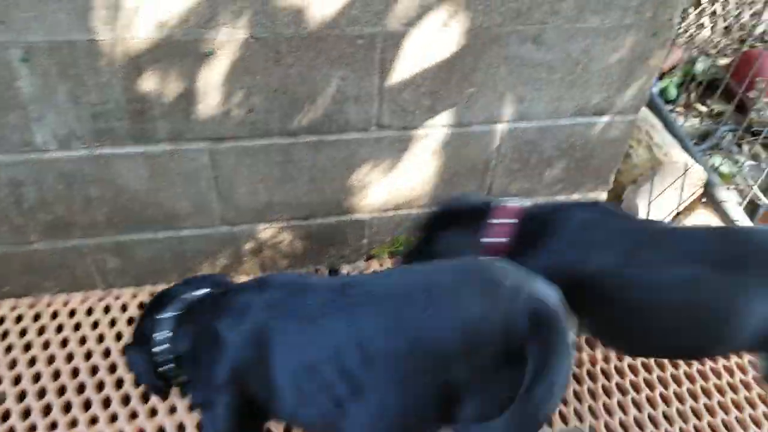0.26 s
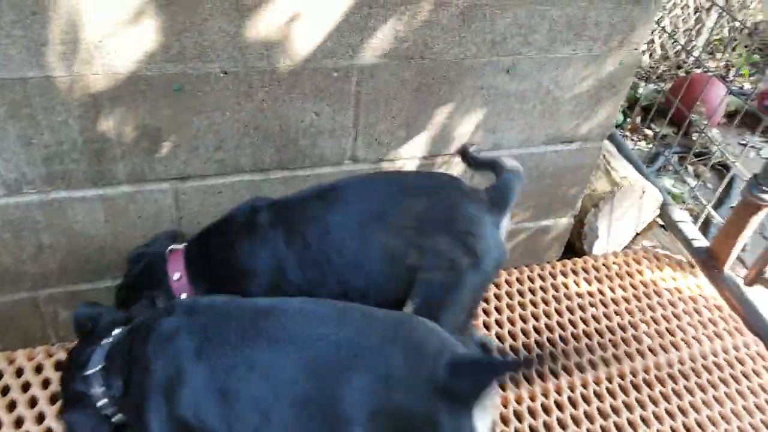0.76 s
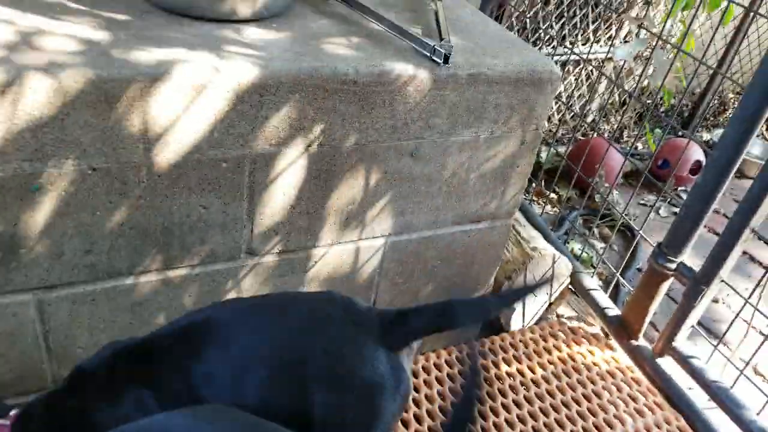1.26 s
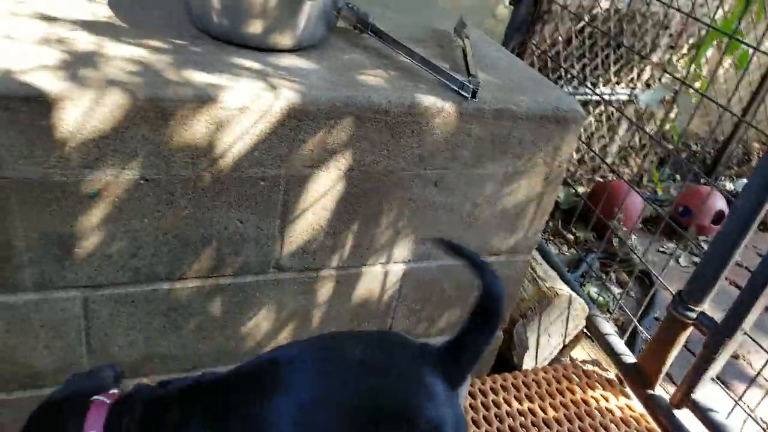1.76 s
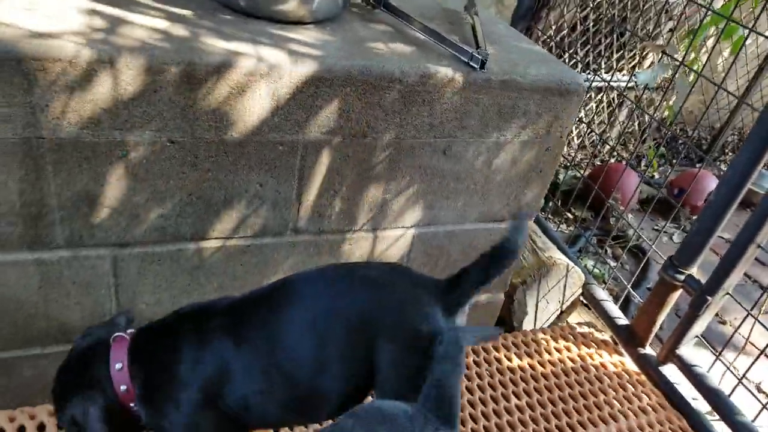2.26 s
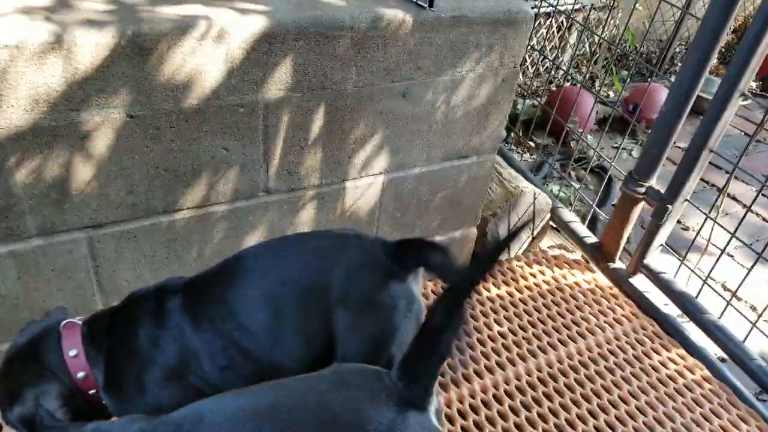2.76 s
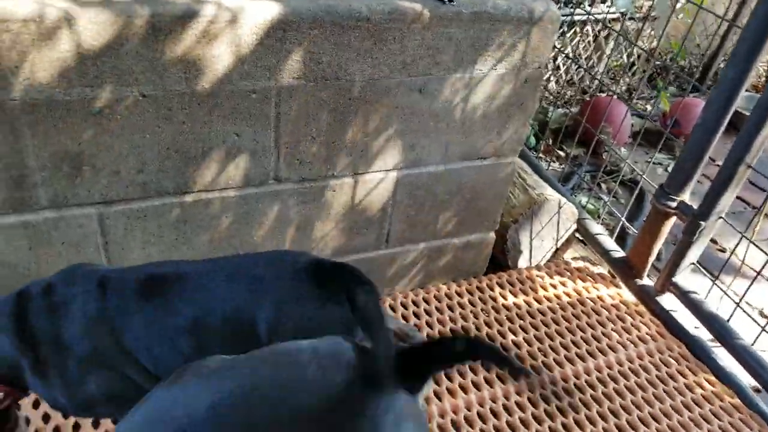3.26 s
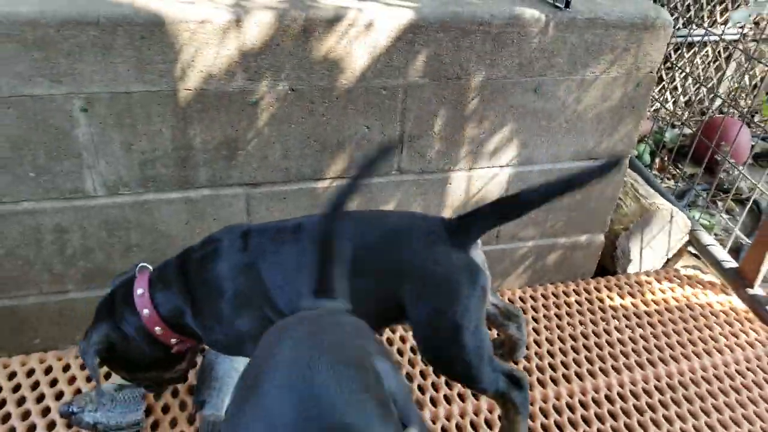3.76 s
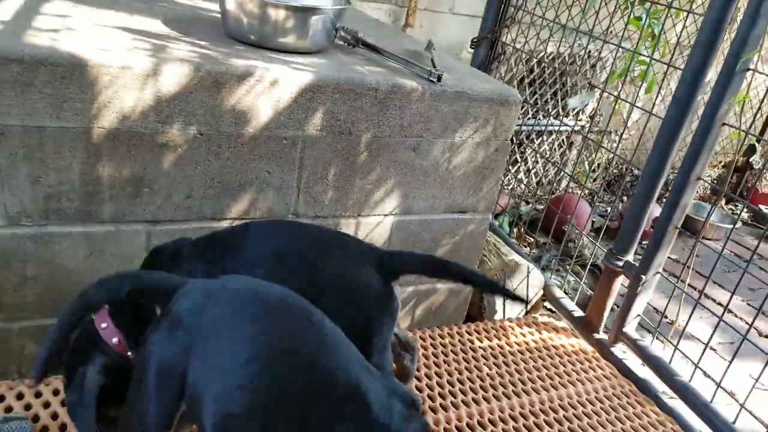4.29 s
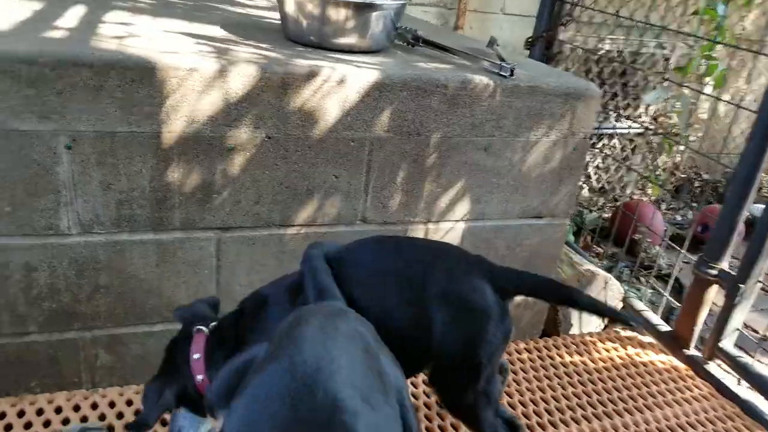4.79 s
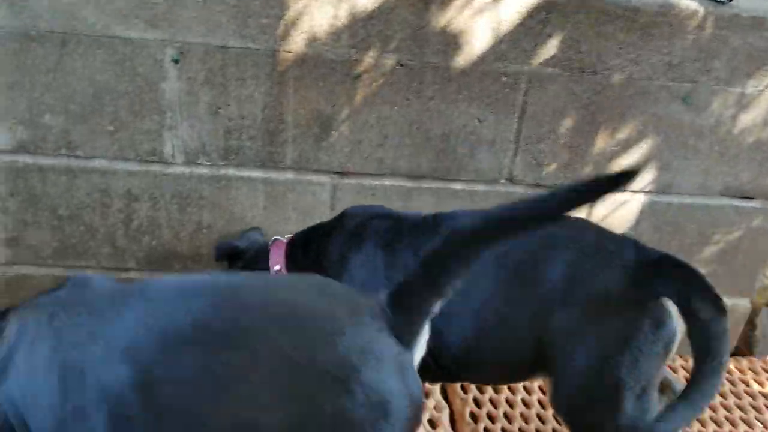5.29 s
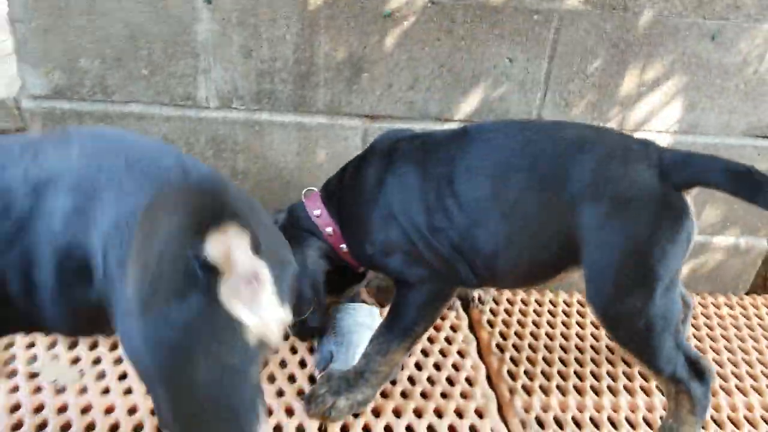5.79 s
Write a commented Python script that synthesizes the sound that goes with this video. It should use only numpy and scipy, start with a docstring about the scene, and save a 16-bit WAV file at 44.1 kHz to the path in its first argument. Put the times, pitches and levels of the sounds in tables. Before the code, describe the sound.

Shrill hinge squeal, then clattering wire mesh bangs close by; afterwards two puppies patter, scrape and tick their claws over a hard grating outdoors.

```python
"""A wire gate squeals on its hinge, a kennel gate close by in a yard, then bangs and rattles on its frame.
The squeal is jittering harmonics over grit noise; the mesh is blows and small contacts ringing panels.
Two puppies tap claws on a grating (short decaying tones and noise), a collar tag clinks (dying modes)
and paws slide (grainy noise); light wind and the far yard are shaped noise.
Heard at the two microphone ports of a hand-held camera."""
import sys
import numpy as np
from scipy import signal
from scipy.fft import rfft, irfft, next_fast_len
from scipy.io import wavfile
from scipy.ndimage import uniform_filter1d

SR = 44100
rng = np.random.default_rng(int(sys.argv[2]) if len(sys.argv) > 2 else 0)


def log_audio(samples):
    """Write samples as a 16-bit WAV file to the path given in sys.argv[1]."""
    # one column per channel
    frames = np.atleast_2d(samples).T
    # limit to full scale, then quantise
    limited = np.clip(frames, -1, 1)
    pcm = np.round(limited * 32767).astype(np.int16)
    wavfile.write(sys.argv[1], SR, pcm)


N = 266364
T = np.arange(N) / SR
HZ = np.fft.rfftfreq(next_fast_len(N + 4096), 1 / SR)


def amp(db):
    """Amplitude of a level in dB."""
    return 10 ** (np.asarray(db) / 20)


def evened(x):
    """x brought to unit rms over all its rows together."""
    return x / np.sqrt(np.mean(x ** 2) + 1e-20)


def read(points, hz):
    """Value of a frequency table at hz, interpolated along log frequency."""
    f, value = np.transpose(points)
    return np.interp(np.log(hz + 1), np.log(f + 1), value)


def columns(rows, size=N):
    """Curve columns at every sample, and a gate that fades at both ends (no fade-in for a start at zero)."""
    s, *cols = np.transpose(rows)
    t = T[:size]
    since_start = t - s[0] + (s[0] < .01)
    gate = np.clip(np.minimum(since_start, s[-1] - t) / .012, 0, 1)
    return gate, [np.interp(t, s, c) for c in cols]


def coloured(x, points):
    """Gives x the spectrum of the table by a causal minimum-phase filter of unit noise gain."""
    db = read(points, abs(np.fft.fftfreq(4096, 1 / SR)))
    log_gain = np.log(evened(amp(np.maximum(db, -90))))
    taps = np.fft.ifft(np.exp(np.conj(signal.hilbert(log_gain)))).real[:2048]
    filtered = signal.oaconvolve(np.atleast_2d(x), taps[None], axes=1)
    return filtered[:, :x.shape[-1]].reshape(x.shape)


def wander(hz, count, size=N):
    """Slow random curves of unit rms: noise low-passed at hz, drawn at a sixteenth of the sample rate."""
    b, a = signal.butter(2, hz, fs=SR / 16)
    slow = signal.lfilter(b, a, rng.standard_normal((count, size // 16 + 1)))
    smooth = uniform_filter1d(np.repeat(slow, 16, axis=1), size=16)
    return evened(smooth[:, :size])


def split(x, hz):
    """Low and high part of x."""
    low = signal.sosfilt(signal.butter(4, hz, fs=SR, output="sos"), x)
    high = signal.sosfilt(signal.butter(4, hz, "high", fs=SR, output="sos"), x)
    return low, high


def modes(table, count):
    """Dying sine modes, one per row, count samples long."""
    t = T[:count]
    return np.array([amp(db - 60 * t / t60) * np.sin(2 * np.pi * hz * t) for hz, db, t60 in table])


def strikes(times, db):
    """A train of single blows, one sample each."""
    out = np.zeros(N)
    np.add.at(out, (np.asarray(times) * SR).astype(int), amp(db))
    return out


def ports(x, lead, pan_db, echo_db, t60):
    """A source at two ports, left ahead by lead radians, plus block-wall echoes that differ at each port."""
    size, turn = 2 * len(HZ) - 2, np.exp(.5j * lead)
    gains = [turn * amp(pan_db / 2), turn.conj() * amp(-pan_db / 2)]
    direct = irfft(rfft(x, size) * gains, size)[:, :N]
    t = T[:SR // 5]
    sparse = rng.standard_normal((2, len(t))) * (rng.random((2, len(t))) < .05)
    taps = sparse * amp(-60 * t / t60) * (t > .003)
    echoes = signal.fftconvolve(direct, taps / np.linalg.norm(taps[0]), axes=1)[:, :N]
    return direct + amp(echo_db) * echoes


# Far yard spectrum. Each row: frequency in Hz, relative density in dB per Hz.
YARD_SPECTRUM = [(59, 5.5), (100, -35), (194, -2.5), (437, 0), (564, -4), (1300, -1.5), (2170, -12.5),
                 (2860, -9), (4480, -13.5), (7170, -16.5), (9470, -20.5), (15100, -17), (16500, -14)]
# Yard loudness at the camera. Each row: time in seconds, level in dB.
YARD_LEVEL = [(0.0, -41), (0.3, -45), (2.35, -46.5), (2.9, -43), (3.4, -51.5), (3.8, -52), (6.04, -51)]
# How alike the two ports hear the yard. Each row: frequency in Hz, likeness from -1 to 1 (clipped there).
YARD_LIKENESS = [(60, -0.45), (240, 1), (950, 0.41), (3770, -0.23), (15000, 0.22)]


def yard():
    """Far hum of the neighbourhood and rustle of leaves: noise in drifting time-frequency patches."""
    frames, hz = N // 256 + 5, np.fft.rfftfreq(1024, 1 / SR)
    a, b, c, d, patches = rng.standard_normal((frames, 513, 5)).T
    patches = uniform_filter1d(patches, size=14, axis=0)  # across frequency
    patches = evened(uniform_filter1d(patches, size=12, axis=1))  # across time
    same = np.clip(read(YARD_LIKENESS, hz), -1, 1)[:, None]
    left = a + 1j * b
    right = same * left + np.sqrt(1 - same ** 2) * (c + 1j * d)
    z = np.array([left, right]) * amp(read(YARD_SPECTRUM, hz)[:, None] + 2.2 * patches)
    noise = evened(signal.istft(z, nperseg=1024, noverlap=768)[1][:, :N])
    return amp(columns(YARD_LEVEL)[1][0] + [[-1.2], [1.2]]) * noise


# Wind on the microphone ports. Each row: time in seconds, level in dB, left over right in dB.
GUSTS = [(0.0, -41.5, 6), (0.17, -43.5, -10.5), (0.27, -52.5, -3.0), (0.86, -58, -5), (1.26, -38, -9),
         (1.29, -37.5, -21), (1.41, -36.5, 1), (1.44, -34, -14.5), (1.56, -31, -16), (1.6, -31, -6),
         (1.7, -30, -13.5), (1.9, -34.5, -11), (1.95, -36, 5.5), (2.2, -37.5, -9), (2.37, -32.5, 9),
         (2.49, -32.5, -4), (2.56, -33, 11), (2.69, -33, -9), (2.82, -48, -9.5), (3.75, -62, 4.5),
         (4.79, -61, -12.5), (5.06, -44, 1), (5.18, -59, -2), (6.04, -56, -3)]
# Spectrum of the buffeting. Each row: frequency in Hz, relative density in dB per Hz.
BUFFET_SPECTRUM = [(8.8, -40), (15, -71), (43, -0.5), (111, 1), (160, -5), (301, -14), (382, -27),
                   (438, -29), (900, -34), (1170, -29), (1980, -120)]


def wind():
    """Lumpy low pressure, unrelated at the two ports."""
    db, pan_db = columns(GUSTS)[1]
    lumpy = rng.standard_normal((2, N)) * amp(6.0 * wander(20.7, count=2))
    lumps = evened(coloured(lumpy, BUFFET_SPECTRUM))
    return lumps * amp(db + 1.05 * wander(4.9, count=2) + np.array([pan_db, -pan_db]) / 2)


# Paws sliding over the grating. Each row: start in seconds, length in seconds, hiss level in dB before
# the swell, rub over hiss in dB, whistle pitch in Hz, whistle over hiss in dB.
SLIDES = [(4.117, 0.019, -52.5, 2.5, 3360, 7), (4.165, 0.034, -48, -4.5, 3485, 5.5),
          (4.24, 0.015, -58, -12, 3330, -19), (4.42, 0.074, -58.5, -2, 3680, -21),
          (5.016, 0.081, -54, -5, 3620, -7), (5.168, 0.055, -61.5, 2, 3700, -15),
          (5.47, 0.094, -55.5, 4, 3630, -2), (5.576, 0.28, -37.5, -20, 3910, 1),
          (5.792, 0.0064, -38.5, -30, 3900, -25), (5.84, 0.013, -38, -26, 3900, -25)]
# Spectrum of the hiss. Each row: frequency in Hz, relative density in dB per Hz.
HISS_SPECTRUM = [(1470, -44), (2500, -26), (3350, 5.5), (3800, 3), (4180, 1.5), (7370, 2), (8170, 7),
                 (9050, 0.5), (15000, 5), (16100, -22), (16500, -27)]
# a paw lands, presses harder as it slides, lifts
SLIDE_RISE_S, SLIDE_FALL_S, SLIDE_SWELL_DB = 0.0093, 0.021, 1.5
WHISTLE_S = 0.078  # the holes whistle at full strength only this long after a paw lands


def slides():
    """Pads and fur hiss over the ridges in fine grains, with a dull rub and a moving whistle of the holes."""
    graininess_db = 2.0 * wander(240, count=1) + 2.4 * wander(27, count=1)
    grains = rng.standard_normal((5, N)) * amp(graininess_db)
    wide = .75 * grains[0] + .65 * grains[3:]  # a spread-out hiss is only partly alike at the ports
    hiss = coloured(wide, HISS_SPECTRUM)
    rub = evened(split(split(grains[1], 2280)[0], 695)[1])
    narrow = evened(split(grains[2], 235)[0])
    stray = np.cumsum(60. * wander(11.8, count=1)[0]) / SR  # the whistle strays in pitch
    out = np.zeros((2, N))
    for s, length, db, rub_db, hz, whistle_db in SLIDES:
        landing, lifting = (T - s) / SLIDE_RISE_S, (s + length - T) / SLIDE_FALL_S
        gate = np.exp(np.minimum(0, np.minimum(landing, lifting)))
        pressing = amp(SLIDE_SWELL_DB * (np.clip((T - s) / length, 0, 1) + 0.5))
        whistle_fade = np.exp(np.minimum(0, s + WHISTLE_S - T) / 0.017)
        whistle = narrow * np.cos(2 * np.pi * (hz * T + stray)) * whistle_fade
        out += gate * pressing * amp(db) * (hiss + amp(rub_db) * rub + amp(whistle_db) * whistle)
    return out


# Bright ticks of claw tips and grit. Each row: time in seconds, level in dB, pitch in Hz.
TICKS = [(0.829, -33, 6220), (0.9208, -61, 6240), (3.545, -37, 12800), (3.563, -31.5, 5900),
         (3.787, -34.5, 13300), (4.127, -26, 13100), (4.167, -32, 7200), (4.182, -24, 7250),
         (4.1924, -36, 14100), (4.3372, -38, 5780), (4.4288, -26.5, 13100), (4.536, -28.5, 14300),
         (4.686, -34, 5940), (4.7726, -43, 11200), (4.9014, -36, 6000), (5.089, -32, 11600),
         (5.474, -26.5, 5130), (5.5258, -37, 5040), (5.599, -20, 10700), (5.7239, -28, 12850),
         (5.7958, -14, 13900), (5.819, -18, 14800), (5.8472, -11, 13400), (5.8564, -15, 12200),
         (6.005, -34.5, 6000)]
TICK_T60_S = .014


def ticks():
    """Hard tips on metal: treble noise and a high tone that die together."""
    out, t = np.zeros(N + 8000), T[:8000]
    for (s, db, hz), grit in zip(TICKS, rng.standard_normal((len(TICKS), 8000))):
        tick = 0.56 * split(grit, 5600)[1] + 0.61 * np.sin(2 * np.pi * hz * t)
        out[int(s * SR):][:8000] += amp(db - 60 * t / TICK_T60_S) * tick
    return out[:N]


# Collar tag. Each row: time in seconds, tick level in dB, long ring in dB, short ring in dB,
# time the long ring stays free in seconds.
CLINKS = [(3.637, -35.5, -95, -71, 0.016), (3.8807, -34.5, -59.5, -45, 0.1),
          (4.2369, -24, -41.5, -36.5, 0.13), (4.369, -31.5, -49, -48, 0.023),
          (4.4483, -47, -53, -39.5, 0.035), (4.4894, -44, -52, -43, 0.023), (4.5599, -31, -68, -69, 0.06),
          (4.9432, -35, -46, -39, 0.038), (4.9932, -30, -63, -42, 0.071), (5.1926, -41, -55, -54, 0.14),
          (5.278, -40, -54, -45.5, 0.047), (5.3305, -44, -58, -62, 0.081)]
# Slowly dying tag modes. Each row: frequency in Hz, relative level in dB, 60 dB decay in seconds.
TAG_LONG = [(5110, -7, .4), (10390, 1, .3)]
# Quickly dying tag modes. Each row: frequency in Hz, relative level in dB, 60 dB decay in seconds.
TAG_SHORT = [(2320, -11, 0.082), (7470, -11.5, 0.03), (9050, -36, 0.02), (12200, 9, 0.022),
             (14700, -3, 0.027)]


def tag():
    """The tag ticks against its ring and sings; fur or collar stops its long modes."""
    out, t = np.zeros(N + 8000), T[:8000]
    long, short = modes(TAG_LONG, count=8000).sum(0), modes(TAG_SHORT, count=8000).sum(0)
    for (s, db, long_db, short_db, free_s), grit in zip(CLINKS, rng.standard_normal((len(CLINKS), 8000))):
        tick = split(grit, 3400)[1] * amp(db - 60 * t / 0.0086)
        held = np.clip((free_s - t) / 0.0064, 0, 1)
        out[int(s * SR):][:8000] += tick + held * amp(long_db) * long + amp(short_db) * short
    return out[:N]


# Dull thuds of paws and gate post. Each row: time in seconds, level in dB, pitch in Hz.
THUDS = [(1.154, -24, 1070), (1.408, -41, 854), (2.543, -28, 396), (2.731, -31.5, 655), (2.839, -47, 544),
         (3.308, -34, 500), (3.783, -53, 650), (4.417, -40, 1113), (4.812, -45.5, 450), (5.177, -46, 530),
         (5.258, -58, 1020), (5.519, -47, 527), (5.784, -38, 583), (5.948, -42, 1012)]


def thuds():
    """Soft blows: a low tone and dull noise with a softened onset, longer than a claw."""
    out, t = np.zeros(N + 2000), T[:2000]
    for (s, db, hz), grit in zip(THUDS, rng.standard_normal((len(THUDS), 2000))):
        thud = np.sin(2 * np.pi * hz * t) + 1.45 * split(grit, 1650)[0]
        out[int(s * SR):][:2000] += amp(db - 60 * t / 0.14) * thud * (1 - np.exp(-t / 0.0004))
    return out[:N]


# Claws on the grating. Each row: time in seconds, level in dB, pitch in Hz, treble over body in dB.
CLAWS = [(3.618, -60, 1640, -34), (3.83, -31.5, 1460, -20), (3.9634, -33.5, 2120, -2),
         (4.033, -35.5, 3100, -4), (4.0458, -39, 2080, -4), (4.1167, -28.5, 2080, -2),
         (4.131, -27, 2220, -4), (4.3388, -26, 1750, -2), (4.3592, -28.5, 2030, -6),
         (4.3904, -40, 2440, -2), (4.4291, -25, 2080, -24), (4.4583, -32, 2120, -17),
         (4.4623, -27, 1950, -8), (4.513, -36, 2060, -4), (4.7324, -30, 1960, -1.5),
         (4.823, -30.5, 2000, -9), (4.9077, -28.5, 2170, -6), (5.0764, -28.5, 1890, -5.5),
         (5.154, -29.5, 2170, -3.5), (5.177, -27.5, 1680, -10), (5.204, -27, 1980, -19),
         (5.452, -21.5, 2000, -8.5), (5.4763, -24, 1890, -14), (5.5065, -24, 1470, -16),
         (5.564, -49, 2380, 1), (5.6536, -33.5, 2320, 5), (5.8017, -31.5, 2200, 2), (5.9567, -35, 2150, 0)]


def claws():
    """Each claw ticks and rings a hollow cell of the grating, which dies within milliseconds."""
    out, t = np.zeros(N + 2000), T[:2000]
    for (s, db, hz, treble_db), grit in zip(CLAWS, rng.standard_normal((len(CLAWS), 2000))):
        body = split(split(grit, 3140)[0], 690)[1] * amp(-60 * t / 0.014)
        knock = np.sin(2 * np.pi * hz * t) * amp(-60 * t / 0.0083) + 0.69 * body
        tick = amp(treble_db) * split(grit * amp(-60 * t / 0.0034), 3500)[1]
        out[int(s * SR):][:2000] += amp(db) * (knock + tick)
    return out[:N]


# Colour of the struck mesh. Each row: frequency in Hz, relative density in dB per Hz.
MESH_SPECTRUM = [(150, -45), (250, -18), (337, -9.5), (504, -9.5), (703, -11.5), (999, -8.5), (1320, -11.5),
                 (1810, 4), (3300, 0.5), (5470, -14.5), (8330, -15), (10600, -19), (11400, -14.5),
                 (14600, -18.5), (15700, -21), (16500, -21.5)]
# Wash of the wires. Each row: frequency in Hz, 60 dB decay in seconds.
WASH_DECAY = [(300, 0.037), (1000, 0.093), (2000, 0.057), (4000, 0.17), (7000, 0.14), (16000, 0.1)]
# Bar modes of the gate. Each row: frequency in Hz, relative level in dB, 60 dB decay in seconds.
BARS = [(980, -14, .3), (1530, -9, .3), (1696, -10, .4), (1770, -4, .4), (1800, -1, .5), (1845, 0, .8),
        (1945, -4, .4), (2030, -6, .35), (2130, -6, .35), (2235, -5, .4), (2380, -10, .35),
        (2500, -10, .45), (2896, -9, .3), (3100, -11, .3), (3380, -7, .4), (3530, -9, .3), (3700, -10, .3),
        (3900, -11, .25), (4240, -11, .25), (4510, -12, .35)]
CRACK_T60_S = .04


def panels(count):
    """Answer of each mesh panel at each port to one blow: crack, wash of wires and the bar modes."""
    size = SR * 3 // 4
    own = rng.standard_normal((count, 3, size))
    noise = .62 * own[:, :1] + .78 * own[:, 1:]  # the ports hear a wide panel only partly alike
    crack = noise * amp(-60 * T[:size] / CRACK_T60_S) * (1 - np.exp(-T[:size] / .0008))
    hz, t, z = signal.stft(noise[..., ::-1], SR, nperseg=256)
    dying = z * amp(-60 * t / read(WASH_DECAY, hz)[:, None])
    wash = signal.istft(dying, SR, nperseg=256)[1][..., :size]
    ring = evened(crack) + amp(-2.0) * evened(wash)
    ring = coloured(ring.reshape(-1, size), MESH_SPECTRUM).reshape(ring.shape)
    bars = amp(3.5 * rng.standard_normal((count, 2, len(BARS)))) @ modes(BARS, count=size)
    ring = ring + amp(-14.0) * evened(bars)
    return ring / (2 * np.sqrt(np.mean(ring[..., :100] ** 2)))  # a blow peaks near 1


# Bursts of the loose mesh. Each row: loudest moment in seconds, level in dB, rise in seconds,
# 60 dB decay in seconds at haste 1, treble over body in dB, bass over body in dB.
RATTLES = [(1.679, -34, 0.018, 0.34, -3.5, -3.5), (1.828, -39.5, 0.12, 0.59, -7.5, -8),
           (1.911, -52, 0.031, .3, -35, 7), (2.112, -35.5, 0.11, 0.38, -11, -4.5),
           (2.158, -39.5, 0.031, 0.48, -7, -3), (2.57, -35.5, .06, 0.21, -8, 0.5),
           (2.638, -33, 0.15, 0.27, -9.5, -2.5), (2.728, -36.5, 0.03, 0.67, -8.5, -5),
           (2.85, -46, 0.02, 0.53, -13, 1), (2.918, -40, 0.03, 0.25, -0.5, -3),
           (3.15, -41.5, 0.059, 0.75, -19, -7), (3.219, -38.5, 0.057, 0.91, -5, -2.5),
           (3.298, -33, 0.019, 0.43, 3, -10.5)]
RISE_DB = 40.5  # a burst swells by this much during its rise


def shaking(offset_db, haste, size):
    """Level of one band of the rattle: every burst swells, then dies; their powers add."""
    power = 0
    for (s, db, rise, t60, *_), more_db in zip(RATTLES, offset_db):
        late = T[:size] - s
        course_db = np.where(late < 0, RISE_DB * late / rise, -60 * haste * late / t60)
        power = power + amp(db + more_db + course_db) ** 2
    return np.sqrt(power)


# Blows of gate on frame. Each row: time in seconds, level in dB, treble over body in dB,
# bass over body in dB.
BANGS = [(1.159, -42, 11.5, 23.5), (1.3352, -44, 15.5, -2), (1.4021, -28, -6, 9.5), (1.643, -39.5, 13.5, 9),
         (1.6762, -6.5, -5, -1), (1.688, -9.5, -6, -21), (1.8139, -11, -26, -4), (1.8293, -14.5, -32, -8),
         (1.8985, -15.5, -2.5, -2), (1.921, -21, 2, -9), (2.09, -18, -17, 2), (2.108, -23.5, -13, -6),
         (2.1265, -10.5, -11, -5), (2.1545, -7.5, -4, -3), (2.5265, -23, -5.5, 7.5), (2.5436, -14, -34, -4),
         (2.559, -9.5, -6, -17), (2.565, -6.5, -11, -14), (2.611, -11.5, -5.5, 0), (2.7297, -7, 5.5, -4.5),
         (2.817, -25, 0, -26), (2.84, -15, -15, 2), (2.8738, -14, -11, 0), (2.9197, -14, -9, -22),
         (3.07, -34.5, 6.5, -3), (3.0878, -18.5, -9.5, -1), (3.147, -9, -40, -6.5), (3.2084, -14, -23, -4),
         (3.2983, -14, 15.5, 3.5), (3.3214, -9, -25, -16)]
# Gate seen from the two ports. Each row: frequency in Hz, lead of the left port in radians.
GATE_PHASE = [(0, 0), (950, -.9), (1550, -4.6), (2670, -6.6), (3620, -11.9), (4220, -12.9), (6800, -18.1),
              (16500, -41)]
BASS_HASTE, BODY_HASTE, UPPER_HASTE, TREBLE_HASTE = 0.69, 0.93, 1.02, 1.75  # pace of dying
BASS_HZ, UPPER_HZ, TREBLE_HZ = 1300, 2643, 5200  # band edges
UPPER_SHARE = 0.23  # the upper body takes on this share of the treble's dB


def mesh():
    """Blows and a hail of small wire contacts excite the panels, each contact sample on one of them."""
    end = 4 * SR
    sizes = amp(2.35 * np.minimum(rng.exponential(1, end), 4))
    contacts = rng.random(end) < 1200. / SR  # 1200 a second on average
    hail = evened(rng.choice([-1., 1.], end) * sizes * contacts)
    bright_db, dull_db = np.transpose(RATTLES)[4:]
    s, peak_db, treble_db, low_db = np.transpose(BANGS)

    def band(rattle_db, haste, bang_db):
        return hail * shaking(rattle_db, haste, end) + strikes(s, peak_db + bang_db)[:end]

    low = band(dull_db, BASS_HASTE, low_db)
    body = band(0 * dull_db, BODY_HASTE, 0)
    upper = band(UPPER_SHARE * bright_db, UPPER_HASTE, UPPER_SHARE * treble_db)
    treble = band(bright_db, TREBLE_HASTE, treble_db)
    rings = panels(count=4)
    which, out = rng.integers(0, len(rings), end), 0
    for k, ring in enumerate(rings):
        on = which == k
        drive = split(low * on, BASS_HZ)[0] + split(treble * on, TREBLE_HZ)[1]
        drive = drive + split(split(body * on, BASS_HZ)[1], UPPER_HZ)[0]
        drive = drive + split(split(upper * on, UPPER_HZ)[1], TREBLE_HZ)[0]
        out = out + signal.fftconvolve(drive[None], ring, axes=1)
    return ports(out, np.interp(HZ, *np.transpose(GATE_PHASE)), -2.2, -7, .08)


def sung(rows, size, waver_hz, flutter_db, third):
    """An unsteady tone along a curve of pitch and level, with some third harmonic."""
    on, (hz, db) = columns(rows, size)
    waver, flutter = wander(76, count=2, size=size)
    turns = np.cumsum(hz + waver_hz * waver) / SR
    wave = np.sin(2 * np.pi * turns) + third * np.sin(2 * np.pi * 3 * turns)
    return on * np.sqrt(2) * amp(db + flutter_db * flutter) * wave


# Grit in the hinge. Each row: time in seconds, level in dB.
GRIT_LEVEL = [(0, -36), (.15, -36), (.25, -67), (.3, -52), (.48, -35.5), (.6, -45.5), (.75, -48.5),
              (1.03, -54.5), (1.25, -63), (1.42, -55)]
# Colour of the grit. Each row: frequency in Hz, relative density in dB per Hz.
GRIT_SPECTRUM = [(300, -23), (1000, -3), (2000, 22), (3000, 14.5), (5000, 10), (8000, -3), (12000, -25),
                 (16000, -2)]


def grinding(end):
    """Grit crackles as unsteady noise, heard directly and through the bars it stirs."""
    unsteady = amp(1.2 * wander(150, count=1, size=end)[0])
    grit = amp(columns(GRIT_LEVEL, end)[1][0]) * rng.standard_normal(end) * unsteady
    bars = modes(BARS, count=SR // 2).sum(0)
    stirred = signal.oaconvolve(grit, bars / np.linalg.norm(bars))[:end]
    return coloured(grit, GRIT_SPECTRUM) + amp(-5.5) * stirred


# Hinge squeal. Each row: time in seconds, levels of the first, second, third and fourth harmonic in dB.
SQUEAL = [(0, -34.5, -42, -68, -60), (.086, -33.5, -46, -40, -39), (.175, -24.5, -22.5, -29.5, -32),
          (.225, -31.5, -16, -29.5, -27), (.244, -35, -43, -42, -32), (.258, -18, -18, -26, -22),
          (.29, -26.5, -20.5, -32.5, -24.5), (.4, -20, -23.5, -26.5, -26.5), (.432, -33, -27.5, -26.5, -26),
          (.5, -21, -23, -24, -31), (.59, -24, -22.5, -41.5, -33), (.675, -34, -43.5, -43, -50),
          (.76, -45, -30, -29.5, -41), (.79, -36, -27, -29.5, -37), (.82, -50.5, -38, -33.5, -41),
          (.87, -45, -23.5, -33.5, -34.5), (.936, -35, -29, -36, -42), (1.06, -33.5, -31.5, -48, -52),
          (1.126, -37, -41, -48, -52), (1.256, -68, -68, -68, -74), (1.37, -51, -81, -78, -70),
          (1.42, -53, -72, -72, -75)]
# Common level of the higher harmonics. Each row: time in seconds, level in dB.
OVERTONE_LEVEL = [(0, -69.5), (.15, -48), (.28, -48), (.48, -51.5), (.59, -57.5), (.66, -83), (.72, -59),
                  (.88, -64.5), (1, -72.5), (1.2, -101), (1.42, -93)]
# Higher harmonics against that level. Each row: multiple of the slip rate, offset in dB.
OVERTONES = [(5, 13), (6, 10), (7, 14), (8, 2.5), (9, 1.5), (10, 2.5), (11, 3.5), (12, 8)]
# The hinge slips in step with one of two bar modes and creeps or jumps between them.
# Each row: time in seconds, slip rate in Hz.
SLIP_RATE = [(0, 1218), (.1, 1230), (.21, 1236), (.26, 1265), (.3, 1269), (.58, 1268), (.68, 1262),
             (.72, 1232), (.8, 1230), (1.42, 1229)]
RASP, RASP_HZ = 0.087, 430  # grit smears each higher harmonic a little more, this wide
# just after a jump the overtones throb: span, rate, depth
THROB_S, THROB_HZ, THROB = (0.2404, .37), 34.5, 0.32


def squeal(end):
    """Stick-slip at the rate of the table: harmonics of one jittering pitch that flutter apart."""
    level_db = columns(SQUEAL, end)[1]
    hz, top_db = columns(SLIP_RATE, end)[1][0], columns(OVERTONE_LEVEL, end)[1][0]
    since = T[:end] - THROB_S[0]
    throbbing = (since > 0) * (T[:end] < THROB_S[1])
    throb = 1 - THROB * np.cos(2 * np.pi * THROB_HZ * since) * throbbing
    rows = list(enumerate(level_db, 1)) + [(k, top_db + db) for k, db in OVERTONES]
    beats = wander(51, count=2 * len(rows), size=end).reshape(2, len(rows), end)
    smears = wander(RASP_HZ, count=2 * len(rows), size=end).reshape(2, len(rows), end)
    uneven = np.interp(hz, [1238, 1258], [.45, 1])  # the faster swing slips less evenly
    jitter_hz = 2.5 * wander(44, count=1, size=end)[0]
    turns, tone = np.cumsum(hz + jitter_hz) / SR, 0
    for (k, db), beat, smear in zip(rows, beats[0] + 1j * beats[1], smears[0] + 1j * smears[1]):
        depth = uneven * min(.03 + .13 * k, 1.3)  # uneven slips beat against the upper harmonics most
        flutter = 1 + depth * beat + RASP * (k - 1) * uneven ** 2 * smear
        wave = flutter / np.sqrt(1 + 2 * depth ** 2) * np.exp(2j * np.pi * k * turns)
        tone = tone + np.sqrt(2) * amp(db) * wave.imag * (throb if k > 1 else 1)
    return tone


# A short groan of the hinge. Each row: time in seconds, pitch in Hz, level in dB.
GROAN = [(2.02, 963, -60), (2.048, 975, -36), (2.07, 1040, -39), (2.118, 1045, -38), (2.14, 990, -38),
         (2.19, 1050, -44)]
# A side tone near 2.2 kHz: a gate bar ringing along with the squeal.
# Each row: time in seconds, pitch in Hz, level in dB.
BAR_TONE = [(0.2, 2274, -25), (0.248, 2280, -51), (0.284, 2272, -43.5), (0.53, 2190, -35.5),
            (0.54, 2251, -64), (0.622, 2234, -53), (0.646, 2296, -64), (0.68, 2283, -54)]
# Hinge seen from the two ports. Each row: frequency in Hz, lead of the left port in radians.
HINGE_PHASE = [(0, 0), (1380, -1.4), (2330, -6.9), (3100, -8.2), (3620, -12.9), (5080, -15.4),
               (7410, -20.8), (16500, -30)]


def hinge():
    """Dry metal slipping on its pin: squeal and grit, a gate bar ringing along, then a groan."""
    end = round(GROAN[-1][0] * SR)
    gate = columns(SQUEAL, end)[0]
    out = gate * (squeal(end) + grinding(end))
    out = out + sung(GROAN, end, waver_hz=22., flutter_db=3.5, third=.3)
    out = out + sung(BAR_TONE, end, waver_hz=4.3, flutter_db=1.3, third=0)
    return ports(out, np.interp(HZ, *np.transpose(HINGE_PHASE)), -.6, -10, .12)


LAG_S = .00041  # the paws reach the left port this much later


def scene():
    """All sources at the two ports; claws, thuds, tag, ticks and slides share one place."""
    near_paws = claws() + thuds() + tag() + ticks() + slides()
    pups = ports(near_paws, -2 * np.pi * HZ * LAG_S, -2.5, -5, .03)
    return yard() + wind() + pups + mesh() + hinge()


EDGE_HZ = 15950


def record(dry):
    """The band limit of the camera: a steep low-pass on both microphone ports."""
    low_pass = signal.firwin(511, EDGE_HZ, window=("kaiser", 9), fs=SR)
    return signal.oaconvolve(dry, low_pass[None], "same")


dry = scene()
out = record(dry)
log_audio(out)
```